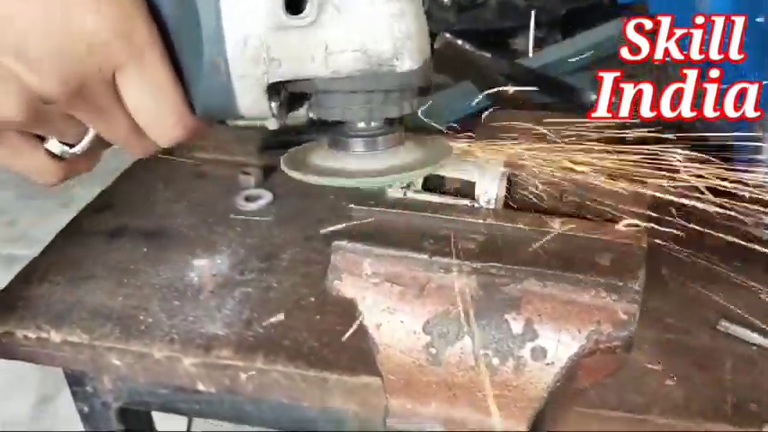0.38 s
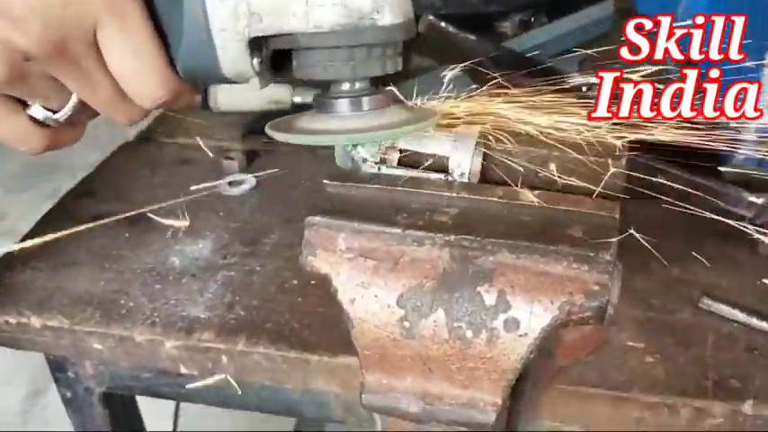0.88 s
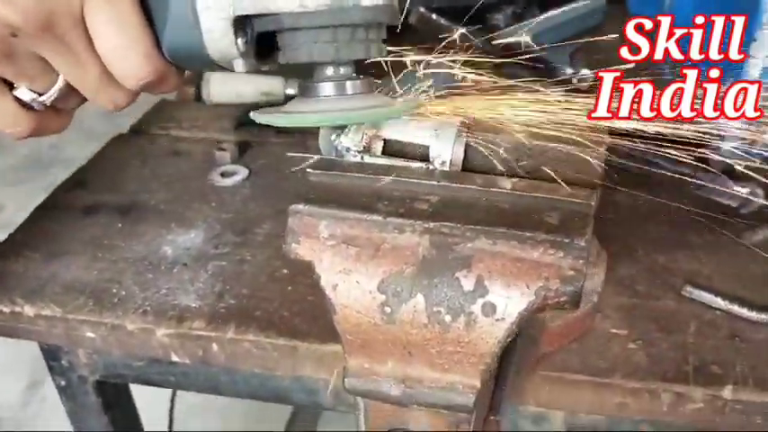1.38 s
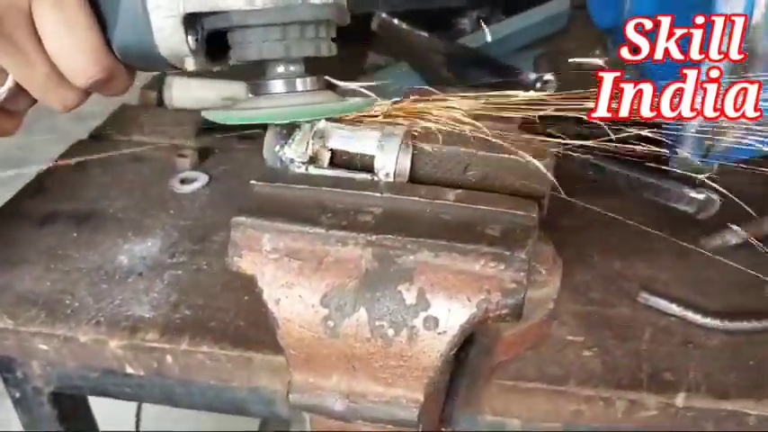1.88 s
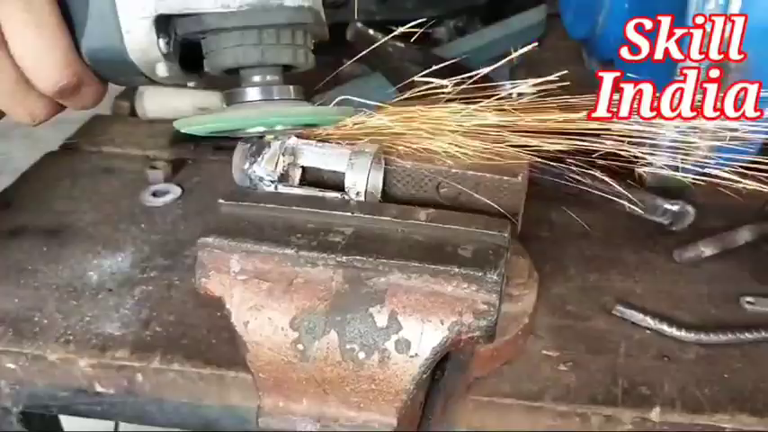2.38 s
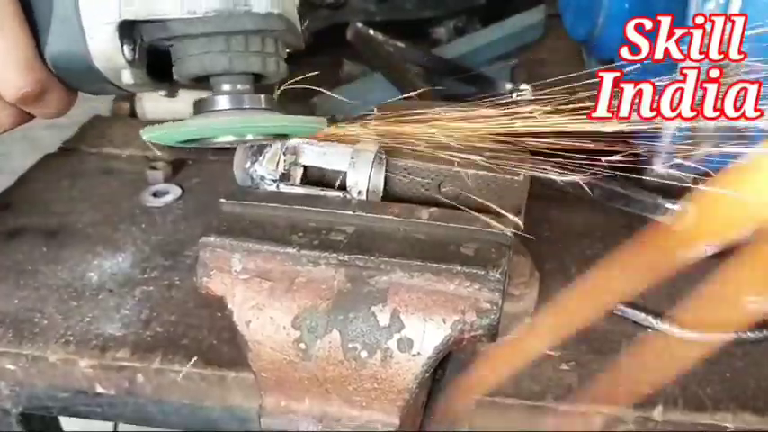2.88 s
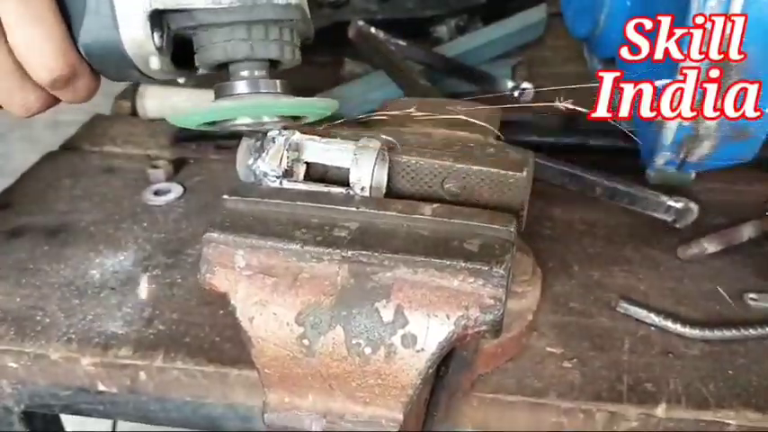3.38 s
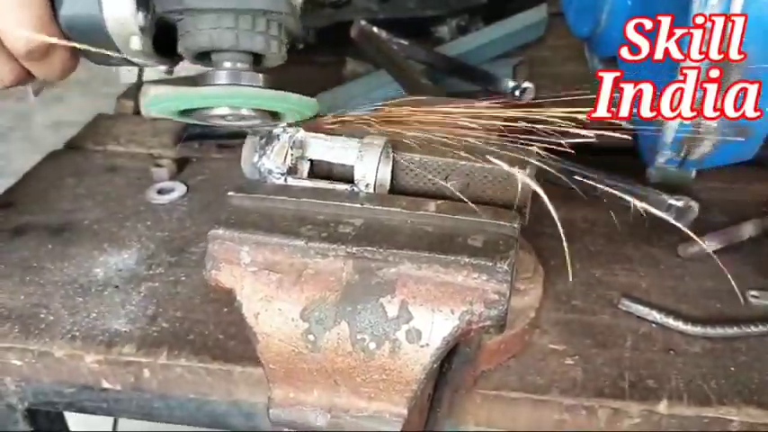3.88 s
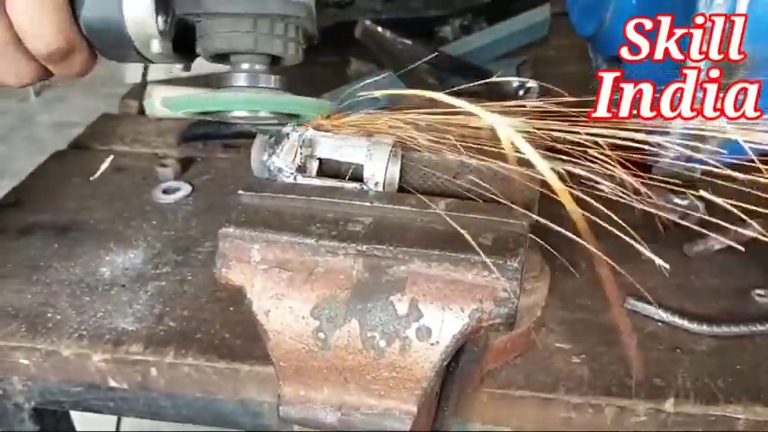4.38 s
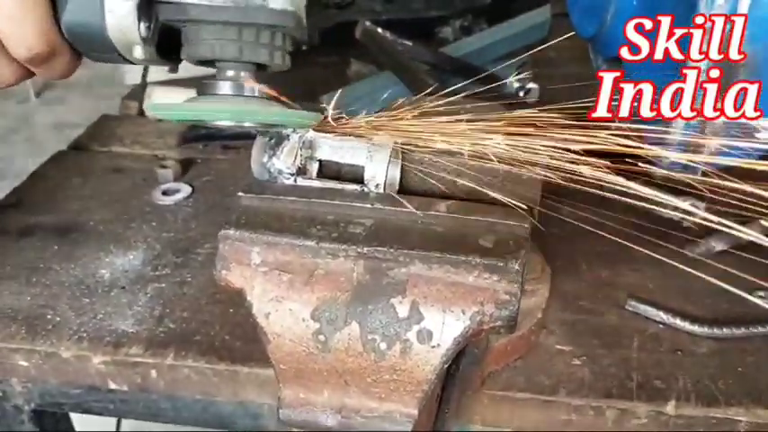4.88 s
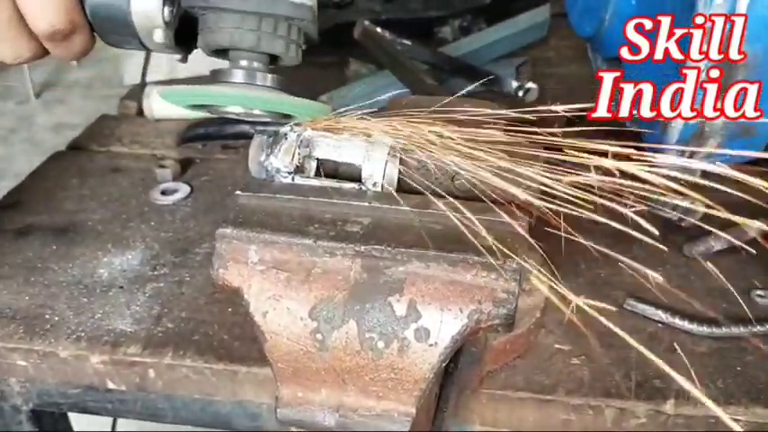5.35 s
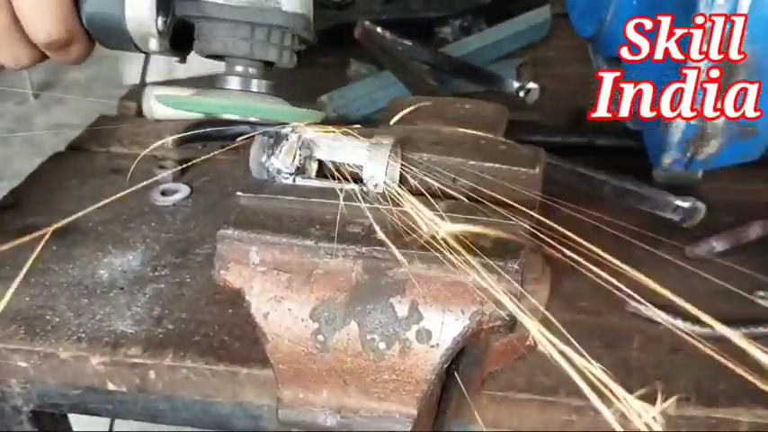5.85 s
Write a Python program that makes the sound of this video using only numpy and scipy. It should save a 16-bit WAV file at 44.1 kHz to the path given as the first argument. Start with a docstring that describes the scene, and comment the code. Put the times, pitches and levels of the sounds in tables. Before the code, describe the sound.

An angle grinder works steel clamped in a bench vise, running at full cry from the first instant to the end at 6 seconds. A broad, gritty roar carries a harsh metallic ring that throbs very fast, like a buzzing screech. From 0 to 2 seconds the steel part chatters in short, fairly low bursts beneath shrill disc ringing, with a hollow scrape near 0.7. From about 2 to 3.3 the sound is thicker, with rumble, overload thuds and small sliding groans, strongest near 3. Around 3.3 to 3.6 the bite lightens briefly and the disc speeds up a little, then the roar swells again. From 4.5 onward thin rotating tones flicker through the high ringing, with a few more thuds and vise hums. Tiny skips interrupt the level throughout. Two close microphones catch it, shifting between sides, slightly overloaded, with short workshop reflections.

```python
"""A hard ring of metal throbs over a broad roar: an angle grinder cuts a steel part in a bench vise.
High spots on the disc strike once a turn and grit scrapes between them; both drive resonances of part,
guard, rim and disc, which throb with the mains ripple. Shaped noise makes the roar, sines make the motor
tone, and resonant noise makes the vise hum, a hollow scrape and sliding groans. The top ring overloads
the two close microphones into low thuds, and sparse reflections surround the tool."""
import sys
import numpy as np
from scipy import signal
from scipy.io import wavfile
from scipy.ndimage import uniform_filter1d

SR = 44100
rng = np.random.default_rng(int(sys.argv[2]) if len(sys.argv) > 2 else 0)


def unload_audio(sound):
    """Save the sound as a 16-bit wav file, at the path given as the first command line argument."""
    columns = np.transpose(np.atleast_2d(sound))
    # keep every value between -1 and 1, then stretch to whole-number steps
    steps = np.round(np.clip(columns, -1, 1) * 32767)
    wavfile.write(sys.argv[1], SR, steps.astype(np.int16))


def volts_from_decibels(level):
    """Turn decibel levels (scalar or array-like) into linear amplitude factors."""
    exponent = np.asarray(level, float) / 20
    return 10 ** exponent


N = 264159

# The disc skips and its bite changes for a moment.
# Each row: middle in seconds, length in seconds, level change in dB.
SKIPS = [(.24, 0.018, 0.5), (.385, 0.02, -2), (.49, .03, 0), (.94, 0.025, 0), (1.31, 0.042, -0.5),
         (1.49, 0.052, -2.5), (1.69, 0.051, -0.5), (1.9, .03, 0), (2.2, 0.04, -2.5), (2.3, 0.018, -2),
         (2.59, 0.045, 0), (3.31, 0.018, -4), (3.64, 0.065, -3.5), (3.82, 0.056, -3), (4.06, 0.034, -1.5),
         (4.22, 0.051, -3), (4.42, 0.043, 0.5), (4.77, 0.016, -4), (4.89, 0.071, -1), (5.065, 0.024, -2),
         (5.24, 0.03, 1), (5.34, 0.027, -4), (5.49, 0.022, -0.5)]
SKIP_EDGE_S = 0.019
UNSTEADY_HZ = 13.8  # fastest independent wavering of the levels
RIPPLE_HZ = 149.9  # mains ripple


def evened(x):
    """Normalization: scales a signal to rms 1."""
    return x / np.sqrt(np.mean(x ** 2) + 1e-20)


def columns(rows):
    """Linear interpolation: every column of a curve table after the time, one value a sample."""
    seconds, *curves = np.transpose(rows)
    return [np.interp(np.arange(N) / SR, seconds, curve) for curve in curves]


def wander(rate_hz):
    """Low-passed noise: a random curve of rms 1 that changes up to about rate_hz."""
    noise = rng.standard_normal(N + SR // 4)  # the extra start lets the filter settle
    return evened(signal.lfilter(*signal.butter(2, rate_hz, fs=SR), noise)[-N:])


def swells(rows, edge_s):
    """Superposition of envelopes that rise, hold and fall: (middle s, held length s, height)."""
    t, out = np.arange(N) / SR, np.zeros(N)
    for middle, length, height in rows:
        reach = length / 2 + edge_s
        near = slice(max(int((middle - reach) * SR), 0), int((middle + reach) * SR))
        rise = np.clip(1 - (abs(t[near] - middle) - length / 2) / edge_s, 0, 1)
        out[near] += height * np.sin(np.pi / 2 * rise) ** 2
    return out


def band(x, low_hz, high_hz):
    """Zero-phase band-pass: filtering both ways adds no phase shift to a pulse."""
    return signal.sosfiltfilt(signal.butter(2, [low_hz, high_hz], "band", fs=SR, output="sos"), x)


def resonate(x, hz, width):
    """Heterodyne resonance: shifts the curve hz to zero, smooths twice and shifts back."""
    turn = np.exp(2j * np.pi * np.cumsum(hz * np.ones(N)) / SR)
    r = np.exp(-np.pi * width / SR)
    return 2 * (turn * signal.lfilter([(1 - r) ** 2], [1, -2 * r, r * r], x / turn)).real


def plateau(x, hz, width):
    """Modal overlap: close modes give a response flat across width and steep outside, along hz."""
    turn = np.exp(2j * np.pi * np.cumsum(hz) / SR)
    low_pass = signal.butter(3, width / 2, fs=SR, output="sos")
    return 2 * (turn * signal.sosfilt(low_pass, x / turn)).real


def strikes(angle, count=64):
    """Periodic impact: one sharp pulse a turn, as a closed sum of count harmonics."""
    half = np.sin(angle / 2)
    return np.sin((count + .5) * angle) / np.where(abs(half) < 1e-6, 1e-6, half)


def hopping(drive, centres_hz, favour, width):
    """Power sharing among modes: fixed groups divide one ring unevenly and by turns."""
    hop_db, hop_hz = 1.5, 10.8  # each group also wavers by itself
    gains = np.array([volts_from_decibels(db + hop_db * wander(hop_hz)) for db in columns(favour)])
    gains /= np.sqrt((gains ** 2).sum(0))
    groups = zip(gains, centres_hz)
    return sum(gain * evened(plateau(drive, hz * np.ones(N), width)) for gain, hz in groups)


def ring_levels():
    """Contact excitation: gains of part, guard, rim and disc follow contact, skips and surges."""
    # How hard the rings are driven between surges as the contact point wanders.
    # Each row: time in seconds, then disc, guard, rim and part in relative dB.
    contact = [(0.0, -26.5, -35.5, -36, -42.5), (0.46, -35, -34.5, -48, -33.5),
               (0.57, -35.5, -36.5, -56, -39), (0.93, -40, -33, -44, -41), (1.25, -45.5, -41.5, -42, -36),
               (1.52, -42, -35.5, -45, -35.5), (1.63, -30, -34, -51, -40.5), (1.9, -35.5, -31.5, -42, -59),
               (2.19, -25.5, -34, -36, -52), (2.6, -28, -39.5, -42, -50.5),
               (2.94, -25.5, -45, -32.5, -48.5), (3.34, -38.5, -43, -36, -44), (3.6, -31, -35, -35.5, -48),
               (4.15, -30.5, -34, -33.5, -43), (4.74, -25.5, -40, -37.5, -45.5),
               (5.04, -35.5, -50, -33.5, -45.5), (5.39, -32.5, -52, -39, -58),
               (5.7, -27, -32.5, -34.5, -41), (5.86, -34, -51, -49, -75), (5.99, -94, -83, -74, -61)]
    # Short surges as the disc chatters: one list each for part, guard, rim and disc.
    # Each row: middle in seconds, length in seconds, level in relative dB.
    surges = [
        [(.005, 0.0099, -27), (0.186, 0.057, -29), (0.32, 0.074, -28), (0.497, 0.083, -27.5),
         (0.59, 0.027, -35), (0.697, 0.067, -28), (0.807, 0.058, -29.5), (0.892, 0.07, -27),
         (.985, 0.034, -26.5), (1.047, 0.051, -27.5), (1.186, 0.11, -34), (1.335, 0.01, -38),
         (1.388, 0.035, -29), (1.5, 0.11, -31.5), (1.65, 0.018, -34), (1.756, 0.045, -29), (1.9, .04, -37),
         (2.09, .03, -40), (2.25, 0.031, -41), (2.373, 0.096, -33.5), (2.532, 0.012, -37), (2.82, .025, -37),
         (3.02, 0.056, -33.5), (3.253, 0.029, -42), (3.621, 0.04, -46), (3.785, 0.025, -40),
         (4.332, 0.016, -39), (4.574, 0.026, -42), (5.096, 0.023, -41), (5.195, 0.013, -37),
         (5.368, 0.024, -41), (5.607, 0.063, -35), (5.77, 0.04, -41)],
        [(.45, 0.045, -46), (.65, 0.12, -47), (1.12, 0.062, -41), (1.28, 0.025, -46), (1.42, 0.046, -46),
         (1.87, 0.019, -37), (2.0, 0.086, -34.5), (2.24, 0.032, -39), (2.4, 0.13, -33.5), (2.65, 0.039, -36),
         (2.78, 0.057, -31.5), (3.03, 0.27, -34.5), (3.55, 0.1, -39.5), (3.78, 0.048, -36), (3.92, 0.14, -43),
         (4.2, 0.086, -41), (4.6, 0.061, -41), (4.84, 0.054, -40), (5.3, 0.051, -37), (5.64, 0.072, -50)],
        [(.1, 0.058, -39), (.45, 0.026, -36), (1.07, 0.047, -40), (2.04, 0.07, -48), (2.99, 0.086, -55),
         (3.4, 0.069, -44), (3.56, 0.038, -37), (3.78, 0.05, -59), (3.93, 0.11, -37.5), (4.31, 0.13, -37),
         (4.77, 0.047, -36), (4.97, 0.067, -46), (5.1, 0.025, -54), (5.24, 0.064, -52), (5.4, 0.042, -38.5),
         (5.55, 0.06, -37), (5.78, 0.13, -33)],
        [(.18, 0.04, -32), (.56, 0.071, -40), (1.05, 0.053, -41), (1.28, 0.021, -36), (1.84, 0.055, -48),
         (2.24, 0.025, -39), (2.42, 0.048, -53), (3.57, .04, -41), (3.72, 0.039, -69), (3.9, 0.086, -36),
         (4.28, 0.12, -45), (4.72, 0.15, -40), (4.95, 0.044, -36), (5.14, 0.028, -37), (5.44, .05, -41),
         (5.84, 0.039, -31)],
    ]
    # Share of each skip's dB felt by part, guard, rim and disc [0-1].
    skip_share = [1, 0.96, 1, 1]
    unsteady_db = [6.3, 2.7, 1.6, 1.3]  # each ring wavers by itself
    surge_edge_s = 0.012
    disc, guard, rim, part = columns(contact)
    skips_db = swells(SKIPS, SKIP_EDGE_S)
    levels = []
    for db, share, waver_db, rows in zip([part, guard, rim, disc], skip_share, unsteady_db, surges):
        steady = volts_from_decibels(db + share * skips_db + waver_db * wander(UNSTEADY_HZ))
        surging = swells([(s, length, volts_from_decibels(peak_db)) for s, length, peak_db in rows], surge_edge_s)
        levels.append(steady + surging)
    return levels


def rings(angle, ripple):
    """Forced resonance: strikes of two high spots and gritty noise drive part, guard, rim and disc."""
    # The lower rings drift with the angle of the tool.
    # Each row: time in seconds, part in Hz, guard in Hz.
    drift = [(0.0, 5820, 7400), (0.53, 5970, 6920), (0.97, 5870, 7050), (1.5, 5950, 7360),
             (1.9, 5840, 7820), (2.59, 5750, 7430), (2.92, 6030, 7700), (3.7, 5750, 7600),
             (4.17, 5700, 7300), (4.85, 5840, 7500), (5.4, 5600, 7300), (5.99, 5840, 7350)]
    # The tool turns in the hand. Each row: time in seconds, left-right difference of the lower rings
    # and of the upper rings in dB before side_share, depth of the throb from 0 to 1.
    tool = [(0.0, 14, -5, 1), (0.3, 6, -14, 1), (1.12, 3, 13, 1), (1.3, -14, -8, 1), (1.55, -3, 34, 1),
            (1.82, -15, 2, 1), (3.2, -16, 2, 0.9), (3.4, 13, 23, 0.9), (3.66, -15, -19, 0.9),
            (3.82, -23, 9, 0.9), (4.95, 40, 30, 1), (5.42, 11, 15, 1), (5.99, 4, 17, 1)]
    # Rows for part, guard, rim and disc: width in Hz, share of clean strikes from 0 to 1, throb of the
    # grit with the turn and throb with the ripple from 0 to 1, flicker in dB per unit of its noise
    # before soft limiting, resting left-right difference in dB.
    ring_traits = [(580, 0.76, 1, 0.55, 1.2, -0.1), (900, 0.52, 0.8, 0.4, 1.8, 6.5),
                   (260, 0.15, 0.4, 0.55, 2, 5.5), (300, 0.12, 0.35, 0.5, 1.8, -5.5)]
    # The contact point favours now one mode group, now another.
    # Each row: time in seconds, relative level of each of the four groups in dB.
    rim_favour = [(0.0, -6, 4, -10, -3), (.12, -11, 1, -2, -8), (.5, -6, -3, -5, -5), (.95, -6, -6, -2, -3),
                  (1.1, -1, 0, -6, -4), (1.25, -8, 0, -1, -6), (1.45, -8, -6, 0, -4), (1.9, -8, 0, -4, -2),
                  (2.2, -12, -9, -5, 2), (2.6, -14, -8, -5, -1), (2.85, -16, -5, -9, 4),
                  (3.0, -15, -11, -6, 0), (3.15, -13, -5, 0, -3), (3.3, -7, 2, 0, -8),
                  (3.4, -12, 3, -2, -11), (3.6, -7, -6, 5, -7), (3.95, -9, 0.5, 2, -9),
                  (4.3, -3, -5, 1, -8), (4.7, -1, -7, -1, -7), (4.95, 0, -2, 3, -12), (5.24, -4, 0, 0, -8),
                  (5.5, -1, 0, -2, -12), (5.8, -5, -1, -7, -14), (5.99, -4, 1, -3, -3)]
    disc_favour = [(0.0, -5, -6, 1, -15), (.25, -5, 0, -5, -21), (.45, 0, -8, -6, -10),
                   (.75, 1, -15, 0, -6), (1.05, -3, -5, -1, 4), (1.2, -2, -1, -3, -3),
                   (1.29, -3, 0, -9, -6), (1.5, -8, -1, -3, -7), (1.62, 4, -12, -4, -10),
                   (1.72, -1, -6, -2, 2), (1.82, 8, -1, -11, -10), (1.97, -11, -10, -2, 8),
                   (2.05, 1, 1, -3, -7), (2.2, -1, -7, -4, -8), (2.27, -2, 0, -1, -2),
                   (2.4, -4, -2, 6, -10), (2.5, -13, -0.5, 0, 0), (2.68, -14, -3.5, -2, -5),
                   (2.74, -9, -1, -9, -6), (2.84, -5, -4, -2, -6), (2.95, 2, -3, -9, -9),
                   (3.0, -5, -7, -6, -2), (3.17, -11, 6, 0, -9), (3.34, -8, -11, 4, 0),
                   (3.5, -9, 3, -3, -11), (3.9, -6, -7, -5, -14), (4.2, -13, 0, -6, -14),
                   (4.6, -5, -1, -10, -20), (5.0, -6, 0, -11, -20), (5.4, -11, 3, -8, -16),
                   (5.86, -9, 4, -9, -17), (5.99, -3, -7, -5, -12)]
    rim_hz, disc_hz = [11150, 11480, 11780, 12200], [12800, 13130, 13440, 13780]
    side_share = 0.26
    spots = strikes(angle) + 0.23 * strikes(angle - 2.9)
    lower_db, upper_db, depth = columns(tool)
    part_hz, guard_hz = columns(drift)
    bodies = [lambda drive, width: plateau(drive, part_hz, width),
              lambda drive, width: plateau(drive, guard_hz, width),
              lambda drive, width: hopping(drive, rim_hz, rim_favour, width),
              lambda drive, width: hopping(drive, disc_hz, disc_favour, width)]
    sides_db = [lower_db, lower_db, upper_db, upper_db]
    bite, out = wander(490), np.zeros((2, N))  # the bite flickers all rings together
    for gain, body, side_db, traits in zip(ring_levels(), bodies, sides_db, ring_traits):
        width, clean, turn, mains, flicker_db, pan_db = traits
        flicker = 2 * np.tanh((bite + 0.72 * wander(530)) / 2)
        throb = (1 + depth * mains * ripple) * volts_from_decibels(flicker_db * flicker)
        grit = rng.standard_normal(N) * (1 + depth * turn * np.cos(angle - 1.3))
        drive = np.sqrt(clean) * evened(spots * throb) + np.sqrt(1 - clean) * evened(grit * throb)
        ring = gain * volts_from_decibels(-5.0) * evened(body(drive, width))
        out += volts_from_decibels(np.outer([.5, -.5], pan_db + side_share * side_db)) * ring
    return out


def roar(angle, ripple):
    """Short-time spectral shaping: patchy noise of fan, gears and grit, partly shared by both sides."""
    # Each row: time in seconds, level in relative dB, tilt toward the bass in dB per octave.
    roar_curve = [(0.0, -34.5, 2.5), (0.23, -32.5, 1), (0.4, -36, -0.7), (0.75, -34, -1.5),
                  (0.92, -35.5, -1.1), (1.52, -36, -1.1), (1.63, -34, -3), (1.68, -37.5, -0.5),
                  (1.88, -35, 0.1), (2.33, -31.5, 0.7), (2.45, -32, 1), (2.56, -36.5, 0), (2.7, -34.5, 0.6),
                  (2.9, -34.5, 0.5), (2.97, -30.5, 0), (3.3, -37, 0), (3.39, -33.5, -0.6),
                  (3.65, -31.5, 2.5), (3.7, -30.5, 0.8), (5.96, -34.5, -0.46), (5.99, -57, -14)]
    # Each row: frequency in Hz, relative level per Hz in dB.
    roar_colour = [(30, -18), (70, -17), (150, -20.5), (500, -6), (1000, -9.5), (1860, -3.5), (2600, -4.5),
                   (3470, 1.5), (4200, -0.5), (5860, -1), (8300, 0), (9900, -8.5), (11500, -4),
                   (12400, -2.5), (13000, -2.5), (13600, 0), (14200, 0), (14900, -1.5)]
    unsteady_db, patch_db, same = 1.33, 3.8, .3  # same: correlation of the two sides
    rasp_db, rasp_hz = 0.96, 180  # grit makes the roar flutter
    hz, frames = np.fft.rfftfreq(1024, 1 / SR), N // 256 + 5
    a, b, c, d, patches = rng.standard_normal((frames, 513, 5)).T
    patches = evened(uniform_filter1d(uniform_filter1d(patches, 4, 0), 10, 1))
    level_db, tilt_db = columns(roar_curve)
    level_db = level_db + swells(SKIPS, SKIP_EDGE_S) + unsteady_db * wander(UNSTEADY_HZ)
    at = np.minimum(np.arange(frames) * 256, N - 1)
    level_db, tilt_db = level_db[at], tilt_db[at]
    f, db = np.transpose(roar_colour)
    colour_db = np.interp(np.log(hz + 1), np.log(f), db)[:, None]
    colour_db = colour_db + tilt_db * np.log2(2500 / np.clip(hz, 300, 9000))[:, None]
    left, other = a + 1j * b, c + 1j * d
    z = np.array([left, same * left + np.sqrt(1 - same ** 2) * other])
    z = z * volts_from_decibels(colour_db + patch_db * patches + level_db)
    air = evened(signal.istft(z, nperseg=1024, noverlap=768)[1][:, :N])
    scale = np.sqrt(np.mean(volts_from_decibels(2 * level_db)))
    throb = (1 + 0.032 * ripple) * (1 + 0.06 * np.cos(angle)) * volts_from_decibels(rasp_db * wander(rasp_hz))
    return volts_from_decibels(2.5) * throb * scale * air


def motor(angle):
    """Harmonics of rotation: a thin armature tone, multiples of the turn and hum at the ripple."""
    # Tone of the armature. Each row: time in seconds, rms level in dB before wavering.
    whine_curve = [(0, -57), (.7, -63), (1.05, -60.5), (1.15, -52.5), (1.4, -64), (1.75, -66), (1.9, -53),
                   (2.1, -69), (2.8, -66), (3.3, -61), (3.6, -64), (4.25, -52), (4.5, -66), (5.9, -61.5),
                   (6, -79)]
    # Turns of the disc heard as thin lines. Each row: time in seconds, then the rms level in dB
    # of each multiple before wavering.
    order_lines = [(0, -73, -61, -53), (3.2, -70, -76, -60), (4.2, -67, -64, -62), (4.5, -55, -45, -58),
                   (4.7, -66, -64, -42), (5.0, -40, -48, -49), (5.15, -57, -47, -63),
                   (5.4, -61, -58, -48.5), (5.6, -53, -40, -50), (5.75, -54, -55, -49),
                   (5.9, -55, -58, -47), (5.99, -63, -59, -66)]
    # The multiples of the turning rate, in the order of those columns.
    orders_heard = [8, 21, 22]
    gear_ratio = 32 / 9
    whine_gain = volts_from_decibels(columns(whine_curve)[0] + 2.2 * wander(9))
    whine = whine_gain * np.sin(gear_ratio * angle + .7 * wander(10))
    lines = np.zeros(N)
    for k, db in zip(orders_heard, columns(order_lines)):
        lines += volts_from_decibels(db + 0.78 * wander(8.7)) * np.sin(k * angle + .5 * wander(7.6))
    hum = volts_from_decibels(-63.0) * evened(resonate(rng.standard_normal(N), RIPPLE_HZ, 30))
    return np.sqrt(2) * (whine + lines) + hum


def vise(ripple):
    """Modal resonance: grit noise hums in the heavy jaws."""
    # Each row: mode in Hz, width in Hz.
    jaw_modes = [(880, 200), (1840, 210), (3600, 420), (4550, 340), (5100, 260)]
    # A mode swells while the grip and angle favour it.
    # Each row: middle in seconds, length in seconds, mode in Hz, level in relative dB.
    humming = [(0.717, 0.049, 880, -43), (1.183, 0.098, 880, -48.5), (1.438, 0.067, 880, -42),
               (1.583, .05, 880, -43), (1.947, 0.077, 920, -41.5), (2.06, 0.072, 920, -40.5),
               (2.274, 0.032, 880, -48), (3.384, 0.16, 880, -40.5), (3.75, 0.064, 880, -44),
               (3.893, 0.041, 880, -40), (5.862, 0.035, 880, -42.5), (0.804, .04, 1850, -38.5),
               (1.03, .03, 1850, -44), (1.337, 0.068, 1850, -41.5), (2.012, 0.17, 1850, -43),
               (2.632, 0.028, 1850, -36), (2.992, 0.061, 1850, -38), (3.37, 0.29, 1850, -42),
               (4.287, 0.043, 1850, -37), (4.732, 0.13, 1850, -37), (4.848, 0.072, 1850, -39),
               (5.01, 0.062, 1850, -41), (5.3, 0.37, 1850, -43.5), (5.48, 0.057, 1850, -62),
               (5.71, 0.03, 1850, -33), (5.82, .03, 1850, -37), (5.926, 0.079, 1850, -32),
               (0.815, 0.048, 3600, -38), (1.427, 0.068, 3600, -61), (1.92, 0.055, 3600, -35),
               (2.314, 0.23, 3600, -40), (2.57, .04, 3600, -65), (3.365, 0.1, 3600, -32.5),
               (5.574, 0.034, 3600, -32), (5.935, 0.11, 3600, -33), (0.217, 0.043, 4550, -41),
               (1.907, 0.023, 4550, -40), (2.438, 0.05, 4550, -34), (3.21, 0.091, 4550, -32),
               (3.404, 0.098, 4550, -32), (3.795, .04, 4550, -47), (4.308, 0.065, 4550, -35),
               (5.063, .05, 4550, -34), (.16, 0.2, 5100, -37), (1.902, 0.031, 5100, -35),
               (2.372, 0.21, 5100, -56), (2.78, 0.027, 5100, -37), (3.015, .05, 5100, -57),
               (3.396, 0.063, 5100, -45), (5.16, 1.2, 5100, -42.5), (5.76, 0.076, 5100, -37)]
    rests_db = [-73, -76, -48, -52, -51]  # each mode at rest, relative
    unsteady_db, edge_s = 6, 0.03
    waver = .014  # rms share by which a mode strays
    out = np.zeros(N)
    for (f, width), rest_db in zip(jaw_modes, rests_db):
        mine = [(s, length, volts_from_decibels(db)) for s, length, hz, db in humming if abs(hz / f - 1) < .06]
        gain = volts_from_decibels(rest_db + unsteady_db * wander(UNSTEADY_HZ)) + swells(mine, edge_s)
        mode_hz = f * (1 + waver * wander(7.8))
        out += gain * evened(resonate(rng.standard_normal(N), mode_hz, width))
    return volts_from_decibels(-7.0) * (1 + 0.5 * ripple) * out


def shop(x, t60=0.089, sway_hz=1.3):
    """Exponential reverberation: three sets of sparse reflections take turns as the tool moves."""
    out, size = np.zeros((2, N)), SR // 5
    for k in range(3):
        taps = np.zeros((2, size))
        at = np.arange(60, size - 20, 20) + rng.integers(0, 20, (2, (size - 61) // 20))
        np.put_along_axis(taps, at, rng.choice([-1., 1.], at.shape), 1)
        taps *= volts_from_decibels(-60 * np.arange(size) / SR / t60)
        # the squares of the three windows always sum to one
        window = np.sqrt(2 / 3) * np.cos(2 * np.pi * (sway_hz * np.arange(N) / SR + k / 3))
        out += signal.oaconvolve(x * window, taps / np.linalg.norm(taps[0]), axes=1)[:, :N]
    return out


def thud_levels():
    """Superposed envelopes: gains of body and sharp edge, a wavering rumble with thuds on top."""
    # Low rumble between thuds. Each row: time in seconds, level in relative dB.
    rumble = [(0.0, -51), (0.3, -54.5), (0.8, -44.5), (1.1, -46.5), (1.9, -48.5), (2.05, -54),
              (2.15, -40.5), (2.5, -37.5), (3.15, -42), (3.3, -44), (3.8, -44), (4.1, -37), (4.6, -46),
              (4.9, -47), (5.6, -45), (5.86, -60), (5.92, -69), (5.99, -46)]
    # Overload thuds. Each row: middle in seconds, length in seconds, level in relative dB,
    # gain of the sharp edge over that of the body in dB, before their own trims.
    thud_rows = [(0.116, 0.061, -40.5, -4.5), (0.608, 0.042, -47, -20), (1.247, 0.024, -47, -10),
                 (1.587, 0.047, -55, -14), (2.129, 0.14, -44, -1.5), (2.276, 0.017, -34.5, -20),
                 (2.393, 0.1, -46.5, -6), (2.632, .05, -42, -10), (2.734, 0.0091, -37, -8.5),
                 (2.83, 0.046, -54, 4), (3.035, 0.13, -33, -16), (3.34, 0.03, -50, -5),
                 (3.6, 0.027, -43, -13), (3.71, 0.058, -43.5, -21), (3.895, 0.02, -62, 9),
                 (4.185, 0.031, -53, -22), (4.287, 0.089, -60, 12), (4.396, 0.035, -44.5, -9),
                 (4.639, 0.069, -43, -21), (5.014, 0.037, -37, -36), (5.171, 0.019, -37, -16),
                 (5.719, 0.039, -38, -14), (5.836, 0.027, -35, -12)]
    rumble_edge_db, unsteady_db, thud_edge_s = -18.5, 1.5, 0.026
    rest_db = columns(rumble)[0] + swells(SKIPS, SKIP_EDGE_S)
    rest, rest_edge = (volts_from_decibels(rest_db + unsteady_db * wander(UNSTEADY_HZ)) for _ in range(2))
    body = swells([(s, length, volts_from_decibels(db)) for s, length, db, _ in thud_rows], thud_edge_s)
    edge = swells([(s, length, volts_from_decibels(db + edge_db)) for s, length, db, edge_db in thud_rows], thud_edge_s)
    return rest + body, volts_from_decibels(rumble_edge_db) * rest_edge + edge


def overload_thuds(dry):
    """Rectification: the power of the top ring, compressed, pushes the membranes at low frequency."""
    power = uniform_filter1d(band(dry, 11370, 13580) ** 2, size=8)
    power = power + 0.066 * power[::-1]  # a little of the other side
    usual = np.maximum(uniform_filter1d(power, size=2000), 1e-9)
    burst = (abs(power) / usual) ** 0.71
    body_gain, edge_gain = thud_levels()
    body = evened(band(band(burst, 105, 820), 81, 1200))
    edge = evened(band(burst, 920, 1384))
    side = volts_from_decibels(np.array([[.9], [-.9]]))
    return side * (volts_from_decibels(-6.0) * body_gain * body + volts_from_decibels(1.0) * edge_gain * edge)


def scrape():
    """Cavity resonance: noise in two pairs of hollow bands, the upper pair starting first."""
    # Rows for the low pair and the high pair: middle in seconds, length in seconds, relative dB.
    pair_swells = [(0.749, 0.043, -40), (0.687, 0.16, -45)]
    # Each row: resonance in Hz, width in Hz, level in relative dB.
    hollow = [(490, 350, 3), (710, 140, -7), (1190, 230, 5), (1600, 490, 2)]
    low, high = (swells([(s, length, volts_from_decibels(db))], 0.14) for s, length, db in pair_swells)
    tones = [volts_from_decibels(db) * evened(resonate(rng.standard_normal(N), f, width)) for f, width, db in hollow]
    both = low * (tones[0] + tones[1]) + high * (tones[2] + tones[3])
    return volts_from_decibels(-3.0) * band(both, 215, 2400)


def groans():
    """Time-varying resonance: noise in one narrow low band slides as the load shifts."""
    # Each row: middle in seconds, length in seconds, level in dB, starting Hz, ending Hz.
    slides = [(2.16, .1, -52, 170, 130), (2.25, .08, -52, 400, 460), (2.35, .07, -46, 240, 160),
              (2.64, .1, -52, 180, 120), (2.72, .08, -49, 240, 190), (3.05, .14, -45, 200, 135),
              (2.9, .06, -51, 150, 170), (3.19, .1, -46, 195, 120), (2.48, .07, -51, 170, 130),
              (4.15, .1, -52, 190, 150), (5.73, .06, -50, 240, 180), (5.83, .06, -50, 260, 190)]
    width_hz, edge_s = 40, .03
    ends = []
    for s, length, _, from_hz, to_hz in slides:
        ends += [(s - 0.75 * length / 2, from_hz), (s + 0.88 * length / 2, to_hz)]
    gain = swells([(s, length, volts_from_decibels(db)) for s, length, db, _, _ in slides], edge_s)
    return gain * evened(resonate(rng.standard_normal(N), columns(sorted(ends))[0], width_hz))


def scene():
    """Interaural-style delay: the tool is nearer the right microphone, reached seven samples early."""
    # Disc speed, sagging under load. Each row: time in seconds, turns per second before slight wavering.
    speed = [(0.0, 227.6), (0.3, 226.3), (0.6, 224.2), (1.05, 223.3), (1.35, 223.6), (1.7, 222.1),
             (2.0, 224.7), (2.4, 226.2), (2.7, 226.2), (3.0, 224.8), (3.25, 226.7), (3.5, 230.7),
             (3.9, 233.0), (4.1, 232.8), (4.95, 230.4), (5.4, 232.0), (5.6, 231.9), (6.0, 230.6)]
    angle = 2 * np.pi * np.cumsum(columns(speed)[0] * (1 + 0.0012 * wander(30))) / SR
    ripple = np.cos(2 * np.pi * RIPPLE_HZ * np.arange(N) / SR + 0.94 * wander(14.6))
    near = rings(angle, ripple) + vise(ripple) + motor(angle) + scrape() + groans()
    direct = np.array([np.roll(near[0], shift=7), near[1]])
    return direct + roar(angle, ripple) + volts_from_decibels(-4.5) * shop(near)


def top_cut(x):
    """Nothing passes above the cut-off."""
    return signal.sosfilt(signal.butter(12, 15670, fs=SR, output="sos"), x)


def record(dry):
    """Microphone nonlinearity: ring bursts pull low negative thuds, peaks saturate, bass rolls off."""
    out = dry - overload_thuds(dry)
    out = .3 * np.tanh(out / .3)  # the tallest bursts are squeezed
    out = signal.lfilter(*signal.butter(1, 55, "high", fs=SR), out)  # bass roll-off below 55 Hz
    return top_cut(out)


dry = scene()
out = record(dry)
unload_audio(out)
```